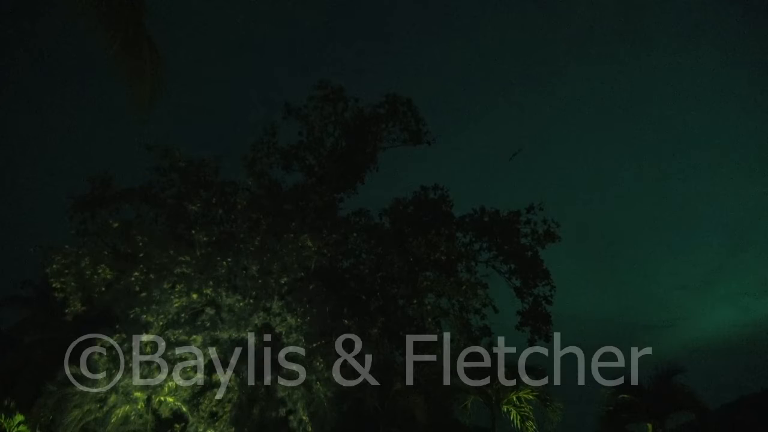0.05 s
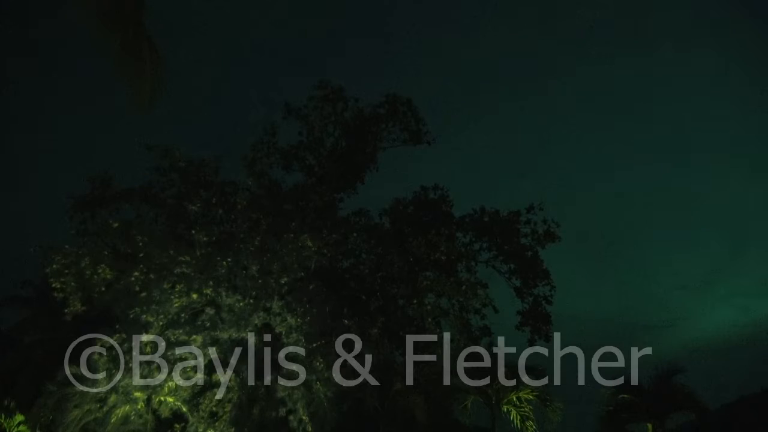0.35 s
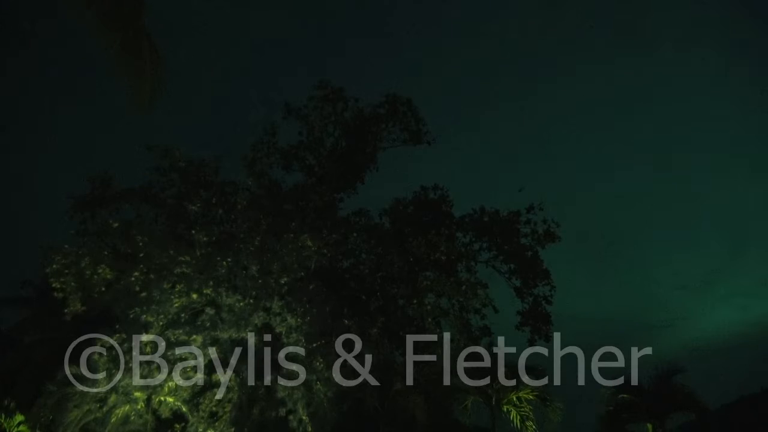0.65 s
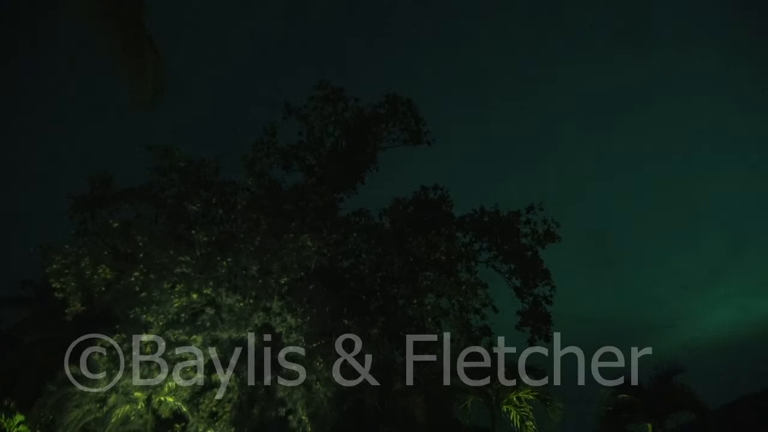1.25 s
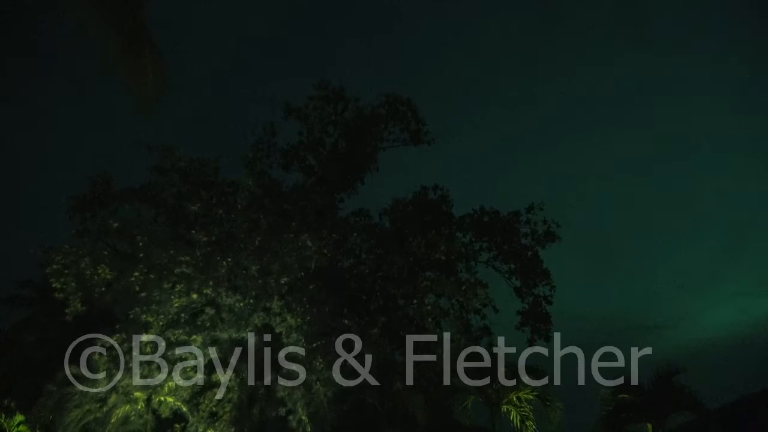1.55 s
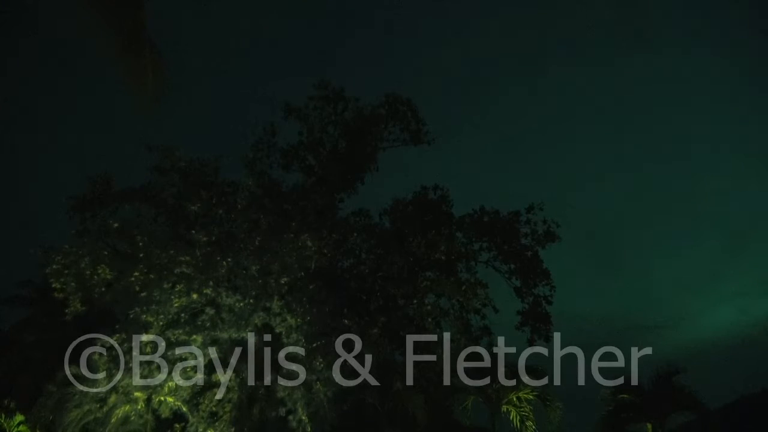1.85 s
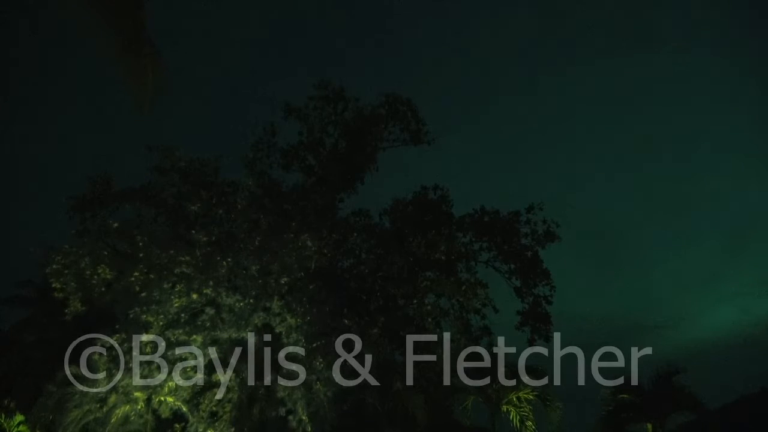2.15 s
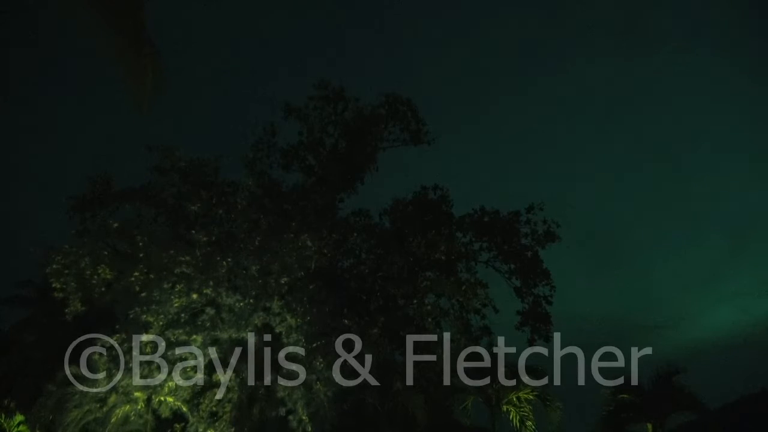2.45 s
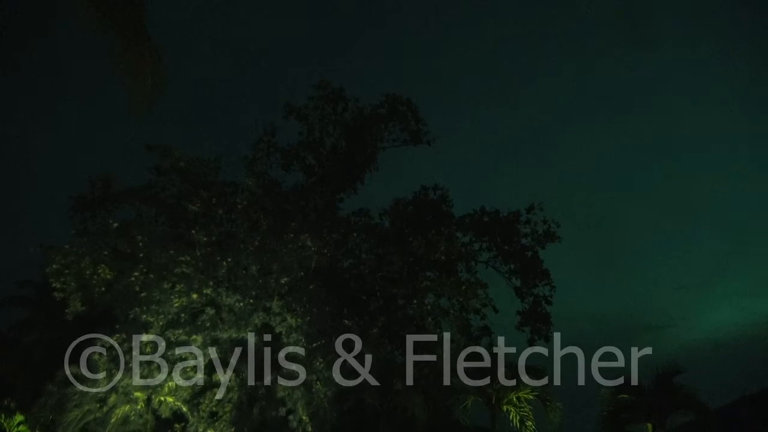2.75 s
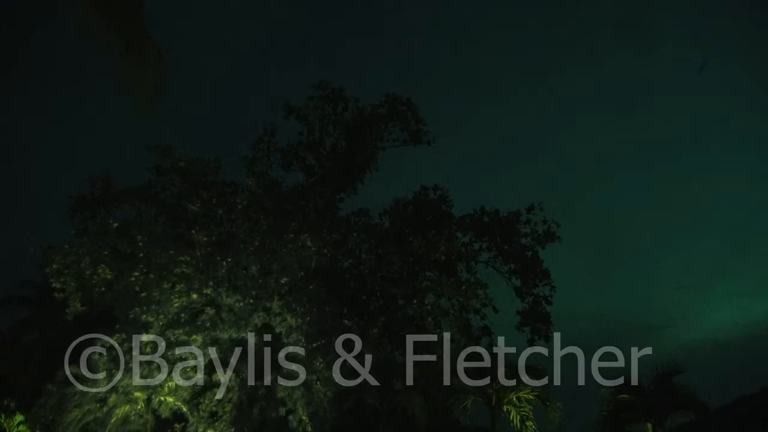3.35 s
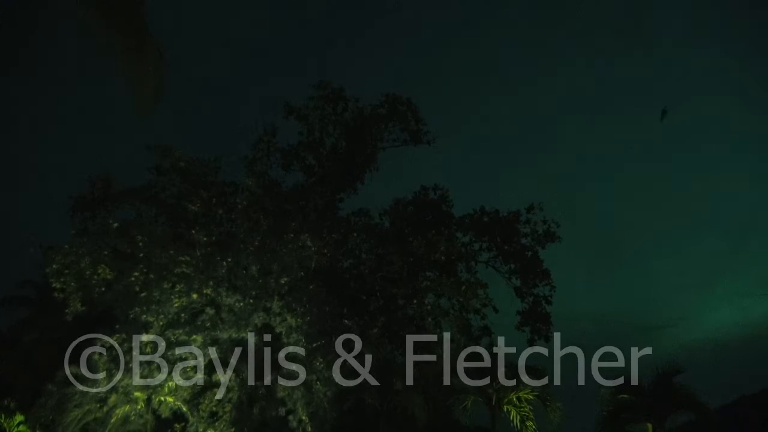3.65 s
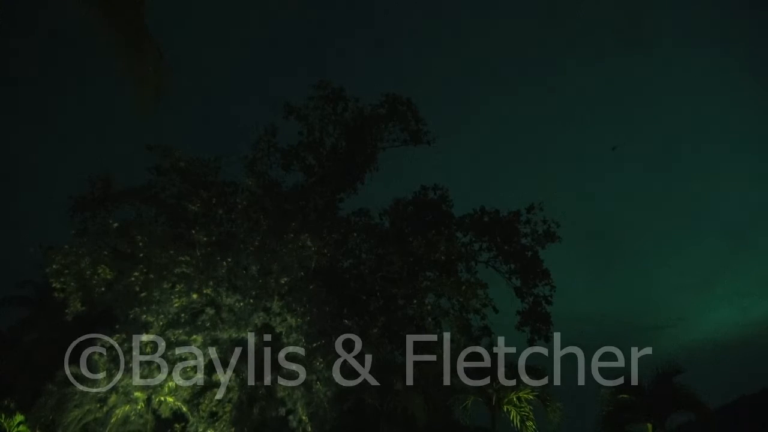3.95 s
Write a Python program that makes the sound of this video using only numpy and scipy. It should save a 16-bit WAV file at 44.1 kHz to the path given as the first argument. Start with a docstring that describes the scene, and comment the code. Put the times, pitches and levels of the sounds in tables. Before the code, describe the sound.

A large bat colony screeches far off, a dense hiss with squeaks and rasps showing through.

```python
"""A swelling hiss of countless far screeches: a large roost, most likely fruit bats, squabbles in
the trees before dawn. Nearer animals rasp as pulses of air ring their throats; others yelp, and
one gives a thin, stuttering squeal. Lower, gliding squawks come from deep in the colony.
Trunks and leaves add a short echo, and a distant machine hums underneath."""
import sys
import numpy as np
from scipy import signal
from scipy.io import wavfile

SR = 44100
rng = np.random.default_rng(int(sys.argv[2]) if len(sys.argv) > 2 else 0)


def bounce(signal):
    """Save signal as a 16-bit WAV file at the path given by the first command-line argument."""
    frames = np.transpose(np.atleast_2d(signal))
    limited = np.clip(frames, -1, 1)
    pcm = np.round(limited * 32767).astype(np.int16)
    wavfile.write(sys.argv[1], SR, pcm)


N = 176400  # 4 seconds

SPREAD_DB = 1.5  # about how far single animals sit to the left or right


def chorus():
    """Far screeches merge into hiss, with single chitters and squeaks showing through."""
    # loudness of the massed screeching: (time [s], core level [dB], treble level [dB])
    loudness = [(0.0, -34.5, -40), (0.29, -36, -44), (0.37, -36.5, -46.5), (0.47, -35, -40.5),
                (0.93, -34.5, -40), (1.07, -36, -42.5), (1.77, -35, -42.5), (1.82, -34.5, -41),
                (2.45, -36.5, -43), (2.53, -38, -42.5), (2.82, -39.5, -47), (3.3, -39, -43),
                (3.41, -40, -43), (3.48, -35.5, -45), (3.62, -38, -43), (3.7, -41.5, -48.5),
                (3.82, -39.5, -45), (3.89, -40.5, -51), (4.0, -38.5, -47)]
    # tone colour of the hiss's low, middle and high parts: (frequency [Hz], relative level [dB])
    body_colour = [(1200, -50), (1900, -20), (2400, -10), (2900, -3.5), (3500, -1), (4100, -3),
                   (4800, -6.5), (6000, -23)]
    core_colour = [(3400, -26), (4400, -11.5), (5300, -3.5), (6300, -0.5), (7200, -5), (8200, -12.5),
                   (10000, -33)]
    treble_colour = [(6000, -37), (7800, -1.5), (9000, -1.5), (10500, -3.5), (11700, -8), (13500, -9.5),
                     (15500, -21)]
    core_db, treble_db = in_time(loudness)
    body_db = -39 + 0.92 * (core_db - core_db.mean())  # rises and falls with the core
    body = from_db(body_db) * banded_noise(body_colour, swell_db=2, swell_hz=6.3, bands=14)
    core = from_db(core_db - 1.46) * banded_noise(core_colour, swell_db=0.9, swell_hz=1.8, bands=12)
    treble = from_db(treble_db + 0.5) * banded_noise(treble_colour, swell_db=1.2, swell_hz=20.8, bands=12)
    chitters = crowd(3553, octaves=.45, length_s=.045, glide=.0395, rough=.01, count=260,
                     harmonics=2, overtone_db=-6.5)
    squeaks = crowd(5938, octaves=.75, length_s=.03, glide=.015, rough=.0043, count=440)
    cries = from_db(core_db - 7) * chitters + from_db(core_db - 7.5) * squeaks  # just under the hiss
    return body + core + treble + trees(cries)


def screeches():
    """Air chopped by uneven throat pulses rings two gliding resonances, around a rough tone."""
    # nearer screeches: (start [s], length [s], main resonance at first [Hz], at last [Hz],
    # its width [Hz], its level [dB], second resonance [Hz], its level [dB])
    calls = [ (0.05, 0.3, 3650, 3720, 680, -36, 6240, -54),
             (0.165, 0.11, 3600, 3700, 450, -36.5, 4300, -41),
             (0.407, 0.079, 6400, 6400, 1500, -34.5, 3740, -35.5),
             (0.528, 0.079, 4280, 3880, 550, -36, 8400, -47),
             (0.571, 0.084, 3800, 3590, 380, -32.5, 8300, -41.5),
             (0.615, 0.13, 3760, 3800, 650, -35, 8500, -40.5),
             (0.71, 0.13, 3830, 4090, 450, -36.5, 8150, -49),
             (0.835, 0.145, 3920, 3810, 560, -34, 8370, -40.5),
             (0.84, 0.17, 4700, 4780, 1090, -40.5, 6100, -40),
             (1.068, 0.11, 3410, 3300, 500, -42, 5400, -40), (1.179, 0.17, 3660, 3580, 680, -37, 5740, -42),
             (1.387, 0.097, 6330, 6200, 800, -37, 4070, -42),
             (1.79, 0.23, 5220, 5050, 800, -42.5, 10600, -46),
             (1.97, 0.18, 5520, 5250, 500, -37, 4630, -44),
             (2.082, 0.135, 3940, 3750, 700, -39.5, 4770, -38),
             (2.249, 0.24, 6500, 6200, 1100, -38.5, 3630, -54),
             (2.353, 0.18, 1900, 2180, 260, -55.5, 2910, -50),
             (2.469, 0.28, 2705, 2550, 700, -47, 1800, -62.5),
             (3.051, 0.26, 3600, 3840, 700, -42.5, 5500, -45),
             (3.239, 0.27, 3810, 3810, 160, -45, 4220, -47),
             (3.24, 0.35, 9950, 9800, 700, -52.5, 5400, -50),
             (3.44, 0.19, 3600, 3760, 380, -42.5, 2890, -49),
             (3.635, 0.16, 2950, 2610, 220, -45.5, 7300, -46)]
    rasp_hz, tone_db, attack_s, release_s = 209, -8.5, 0.027, 0.046
    out = np.zeros((2, N))
    for start, length, hz, last_hz, width, db, second_hz, second_db in calls:
        n = int(length * SR)
        t = np.arange(n) / SR
        pulse_hz = rasp_hz * (1 + 0.311 * drift(37.2, SR)[:n])
        pulses = 1 + .35 * np.cos(phase_of(pulse_hz))
        air = pulses * rng.standard_normal(SR)[:n]
        bend = np.geomspace(1, last_hz / hz, n) * (1 + .006 * drift(6.93, SR)[:n])
        tone_hz = hz * bend * (1 + 0.018 * drift(265, SR)[:n])  # fast wobble sounds rough
        tone = rms_one(pulses * np.sin(phase_of(tone_hz)))
        main = rms_one(throat(air, hz * bend, width) + from_db(tone_db) * tone)
        second = throat(air, second_hz * bend, width * np.sqrt(second_hz / hz))
        voice = from_db(db) * main + from_db(second_db) * second
        fade = np.clip(np.minimum(t / attack_s, (length - t) / release_s), 0, 1)
        tremble = from_db(1.1 * drift(25, SR)[:n])
        add(out, start, voice * fade * tremble * pan(rng.uniform(-1.2, 1) * SPREAD_DB))
    return out


def throat(source, hz, width_hz):
    """A throat resonates: it passes only the sound near one moving frequency."""
    carrier = np.exp(1j * phase_of(hz))
    # shift that frequency down to zero, keep what lies close to it, then shift back
    ringing = signal.sosfilt(signal.butter(2, width_hz / 2, fs=SR, output="sos"), source / carrier)
    return rms_one((ringing * carrier).real)


def squeal():
    """A nearly pure cry that stutters; each pulse swells and arches in pitch."""
    # quick pulses of one thin squeal: (start [s], length [s], pitch [Hz], level [dB])
    pulses = [(3.215, 0.052, 3355, -37), (3.272, .035, 3366, -37), (3.307, .036, 3340, -33.5),
              (3.345, 0.06, 3360, -35), (3.4, 0.039, 3348, -32), (3.44, 0.023, 3294, -36),
              (3.463, .035, 3290, -43)]
    out = np.zeros((2, N))
    for start, length, hz, db in pulses:
        u = np.linspace(-1, 1, int(length * SR))  # -1 at the start, 1 at the end
        arch = .018 * (1 / 3 - u * u)
        wobble = .005 * drift(120, SR)[:len(u)]
        tone = np.sqrt(2) * np.sin(phase_of(hz * (1 + arch + wobble)))
        add(out, start, from_db(db) * (1 - u * u) * tone * pan(0))
    return out


def thin_tones():
    """Short, thin gliding tones: lone yelps, plus upper tones of a squawk and the squeal."""
    # thin tones: (start [s], length [s], first pitch [Hz], last pitch [Hz], level [dB],
    # wobble [share of pitch])
    tones = [ (0.26, 0.13, 1620, 1520, -56, 0.037), (0.355, 0.045, 3380, 2900, -44, 0.014),
             (0.73, 0.11, 2200, 2100, -48, 0.053), (0.74, 0.06, 980, 930, -59, .02),
             (1.34, 0.075, 1200, 1290, -59, .02), (1.565, 0.13, 1965, 2030, -49, 0.029),
             (1.62, 0.16, 3910, 3930, -43, 0.017), (1.81, 0.09, 1820, 1780, -58, .018),
             (2.25, 0.1, 8900, 8700, -46, .013), (2.59, 0.08, 1770, 1820, -56, .014),
             (2.89, 0.14, 1280, 1640, -55, 0.028), (3.21, 0.29, 5430, 5400, -45.5, 0.0076),
             (3.33, 0.087, 9800, 9640, -46, .011), (3.445, 0.06, 5330, 5280, -37.5, 0.0073),
             (3.47, 0.059, 6700, 6560, -40.5, 0.01), (3.51, 0.087, 1530, 1500, -55.5, .016),
             (3.66, 0.099, 930, 1020, -60.5, 0.026), (3.82, 0.15, 1110, 940, -56.5, 0.064)]
    return hoarse_tones(tones, overtone_gain=0)


def clear_squawks():
    """A few low cries stand out from the colony, each with an overtone an octave up."""
    # squawks: (start [s], length [s], first pitch [Hz], last pitch [Hz], level [dB],
    # wobble [share of pitch])
    calls = [ (0.56, 0.14, 660, 811, -59, 0.047), (1.06, 0.13, 592, 700, -62, 0.048),
             (1.53, 0.24, 610, 667, -59.5, 0.045), (2.79, 0.27, 540, 790, -59.5, 0.053),
             (2.98, 0.17, 598, 436, -60.5, 0.078), (3.44, 0.11, 930, 786, -58, 0.034),
             (3.93, 0.09, 599, 690, -58, 0.044)]
    return hoarse_tones(calls, overtone_gain=from_db(-3.5))


def hoarse_tones(rows, overtone_gain):
    """Tones that swell, glide and fade; a fast wobble in pitch makes them hoarse."""
    out = np.zeros((2, N))
    for start, length, first_hz, last_hz, db, rough in rows:
        n = int(length * SR)
        wobble = rough * drift(200, SR)[:n]
        phase = phase_of(np.geomspace(first_hz, last_hz, n) * (1 + wobble))
        tone = np.sqrt(2) * (np.sin(phase) + overtone_gain * np.sin(2 * phase))
        swell = 1 - np.linspace(-1, 1, n) ** 2
        tremble_db = 1.3 * drift(33, SR)[:n]
        add(out, start, tone * swell * from_db(db + tremble_db) * pan(0))
    return out


def squabble():
    """Low gliding squawks from deep in the roost, over a wash of noise for their merged echo."""
    # loudness of the far squabbling: (time [s], level [dB])
    loudness = [(0.0, -55), (0.41, -52), (0.6, -56.5), (2.18, -56.5), (2.31, -59), (2.66, -59),
                (2.87, -58.5), (2.93, -56), (3.36, -59), (3.58, -56), (4.0, -55)]
    # tone colour of the merged echo: (frequency [Hz], relative level [dB])
    echo_colour = [(280, -11), (450, -2.5), (650, 4), (900, -2.5), (1300, -2), (1800, 0), (2500, 5.5)]
    db, = in_time(loudness)
    squawks = trees(crowd(637.4, octaves=.7, length_s=.11, glide=.1727, rough=.035, count=90,
                          harmonics=3, overtone_db=-0.5))
    echo = banded_noise(echo_colour, swell_db=2, swell_hz=15.6, bands=12)
    return from_db(db - 4.5) * squawks + from_db(db + 4) * echo


def crowd(pitch_hz, octaves, length_s, glide, rough, count, harmonics=1, overtone_db=0):
    """Many animals call at random, each with a short, rough tone that bends in pitch."""
    out, quiver = np.zeros((2, N)), drift(204)
    level_range_db = 4
    for k, (when, pitch, length, slope, level, side, offset) in enumerate(rng.uniform(-1, 1, (count, 7))):
        u = np.linspace(-1, 1, int(length_s * 2 ** (length / 2) * SR))  # start to end of the cry
        wobble = rough * np.take(quiver, np.arange(len(u)) + int(offset * N), mode="wrap")
        bend = np.exp(glide * (slope * u - u * u / 2))
        hz = pitch_hz * 2 ** (pitch * octaves / 2)
        phase = phase_of(hz * bend * (1 + wobble))
        cry = sum(from_db(overtone_db * h) * np.sin((h + 1) * phase) for h in range(harmonics))
        swell = (1 - u * u) * from_db(level_range_db * level)
        start = (k + when) / count * N / SR - length_s / 2
        add(out, start, cry * swell * pan(side * SPREAD_DB))
    return rms_one(out)


def trees(sound):
    """Trunks and leaves scatter the sound, adding a short, blurred echo."""
    echo_db, decay_s, delay_s = -7.5, 0.45, .008
    t = np.arange(SR // 2) / SR
    tail = rng.standard_normal(len(t)) * from_db(-60 * t / decay_s) * (t > delay_s)
    tail /= np.sqrt(np.sum(tail ** 2))
    return sound + from_db(echo_db) * signal.fftconvolve(sound, tail[None], axes=1)[:, :N]


def machine():
    """A distant machine gives a wavering hum over a low rumble."""
    # tones of the hum: (pitch [Hz], level [dB])
    tones = [(49.5, -67), (98, -70.5), (203.5, -63)]
    # tone colour of the rumble: (frequency [Hz], relative level [dB])
    rumble_colour = [(25, -12), (45, -0.5), (80, 3), (150, 2.5), (230, -2), (330, -7.5), (600, -15),
                     (1200, -59)]
    # where the low sounds sit: (frequency [Hz], left minus right [dB])
    sides = [(100, 0), (150, -2), (205, -9), (260, -5), (360, -7), (480, 0)]
    hum = 0
    for hz, db in tones:
        gain = np.sqrt(2) * from_db(db + 1.5 * drift(15))
        tone = np.sin(phase_of(hz + 1.574 * drift(4)))
        hum += gain * tone * pan(at_hz(sides, hz))
    rumble = banded_noise(rumble_colour, swell_db=1.8, swell_hz=7.2, bands=10, sides=sides)
    return hum + from_db(-57) * rumble


def banded_noise(colour, swell_db, swell_hz, bands, sides=None):
    """Stereo noise in frequency bands that each swell on their own; overall power 1."""
    # how alike the two ears' sounds are: (frequency [Hz], likeness [1 = the same])
    likeness = [(50, .985), (110, .93), (200, .85), (350, .8), (520, .95), (1000, .98), (1400, .999),
                (2000, .998), (3000, .97), (4200, .94), (6000, .84), (9000, .79), (14000, .91)]
    edges = np.geomspace(colour[0][0], min(colour[-1][0], SR / 2 - 1), bands + 1)
    out, white = 0, rng.standard_normal((2, 2, N))
    for k, (low, high) in enumerate(zip(edges, edges[1:])):
        band_filter = signal.butter(2, [low, high], "band", fs=SR, output="sos")
        shared, opposed = signal.sosfilt(band_filter, white[k % 2])
        hz = np.sqrt(low * high)
        alike = at_hz(likeness, hz)
        band = np.sqrt(1 + alike) * shared + np.sqrt(1 - alike) * opposed * [[1], [-1]]
        gain = from_db(at_hz(colour, hz) + swell_db * drift(swell_hz))
        out += gain * band * pan(at_hz(sides, hz) if sides else 0)
    return rms_one(out)


def drift(rate_hz, size=N):
    """A smooth random wander, typically 1 away from zero; a higher rate moves faster."""
    r = np.exp(-40 * np.pi * rate_hz / SR)  # smoothing, at one step per 20 samples
    slow = signal.lfilter([1], [1, -2 * r, r * r], rng.standard_normal(size // 20 + 8002))[4000:]
    return np.interp(np.arange(size) / 20, np.arange(len(slow)), rms_one(slow))


def from_db(db):
    """Turn decibels into a multiplier."""
    return 10 ** (np.asarray(db) / 20)


def rms_one(x):
    """Scale a signal to an average power of 1."""
    return x / np.sqrt(np.mean(x ** 2) + 1e-20)


def in_time(rows):
    """Join timed points with straight lines, one curve per level column."""
    times, *columns = np.transpose(rows)
    return [np.interp(np.arange(N) / SR, times, column) for column in columns]


def at_hz(points, hz):
    """Read a table between its frequencies, with octaves evenly spaced."""
    frequencies, values = np.transpose(points)
    return np.interp(np.log(hz), np.log(frequencies), values)


def pan(db):
    """Left and right gains; positive decibels move the sound left."""
    return from_db(np.array([[.5], [-.5]]) * db)


def phase_of(hz):
    """The running angle of a wave whose frequency moves."""
    return 2 * np.pi * np.cumsum(hz) / SR


def add(out, start_s, sound):
    """Mix a stereo sound in at its start time."""
    i = int(start_s * SR)
    a, b = max(i, 0), min(i + sound.shape[1], N)
    if b > a:
        out[:, a:b] += sound[:, a - i:b - i]


def scene():
    """The screeching slightly to the left, thin tones and squawks ahead, the hum underneath."""
    cries = thin_tones() + clear_squawks()
    colony = chorus() + trees(screeches() + squeal())
    return colony * pan(.9) + trees(cries) + squabble() + machine()


def record(dry):
    """Cut off the very highest treble steeply."""
    cutoff_hz = 15700
    return signal.sosfilt(signal.ellip(12, .2, 80, cutoff_hz, fs=SR, output="sos"), dry)


dry = scene()
out = record(dry)
bounce(out)
```